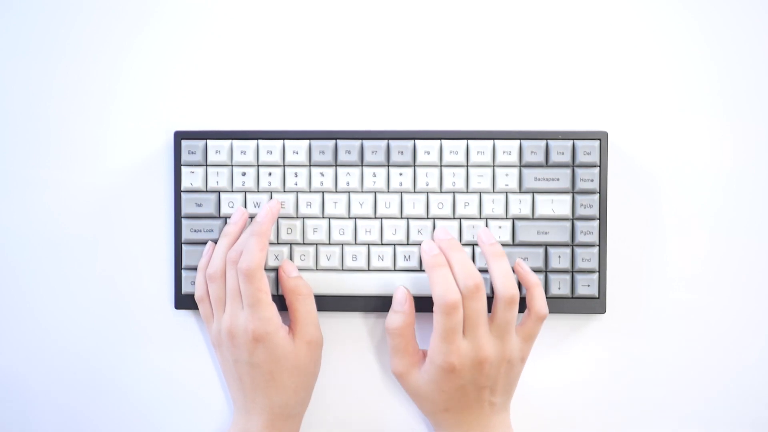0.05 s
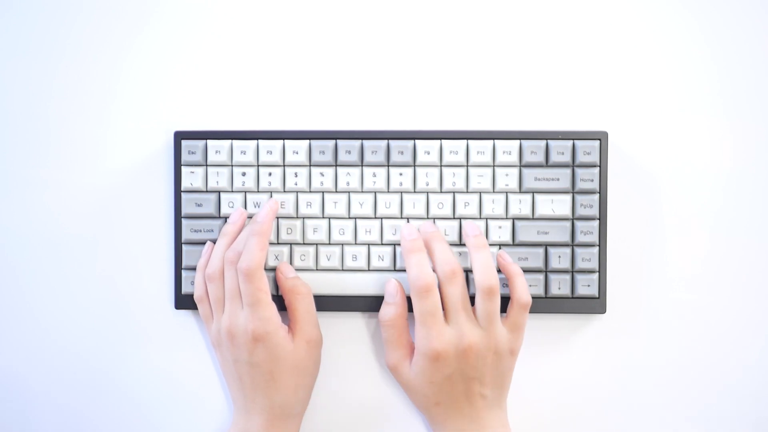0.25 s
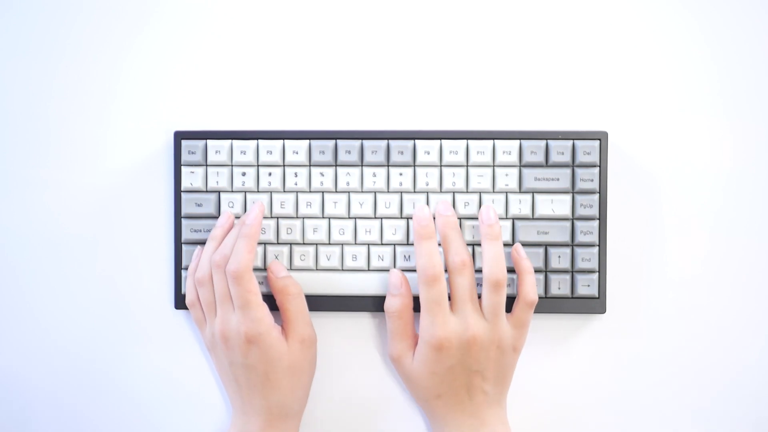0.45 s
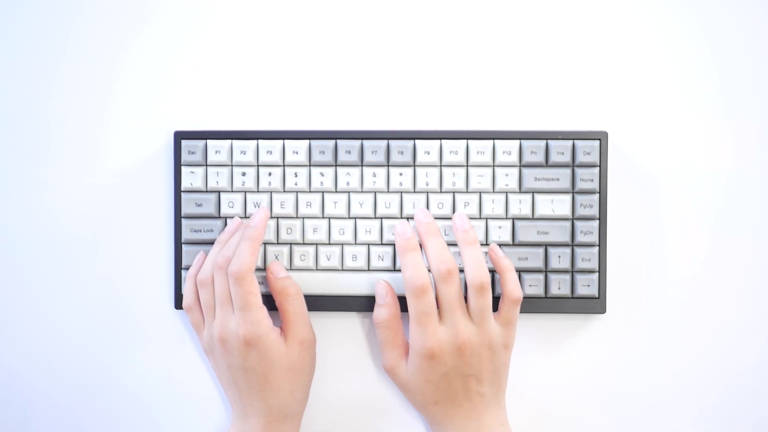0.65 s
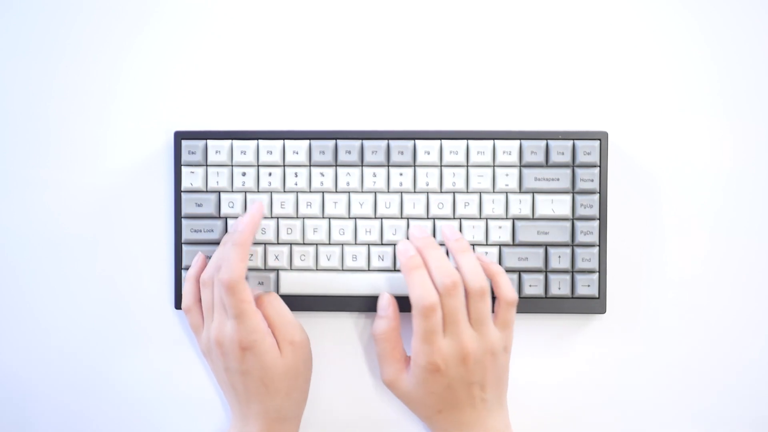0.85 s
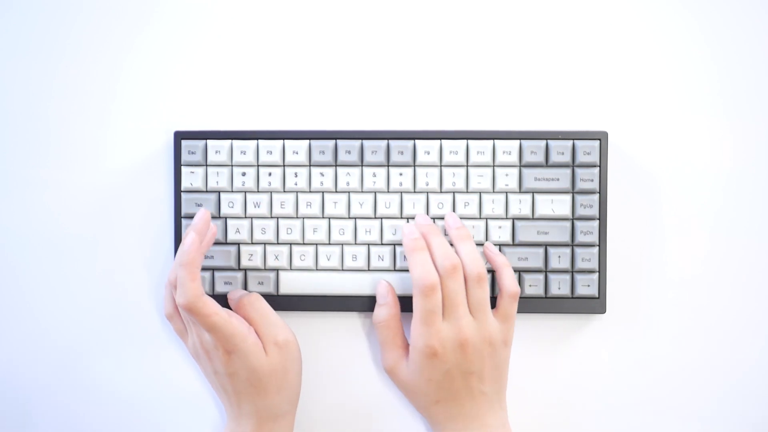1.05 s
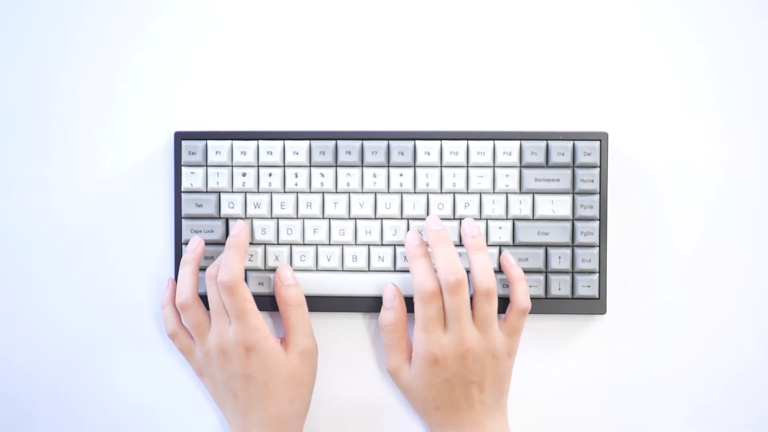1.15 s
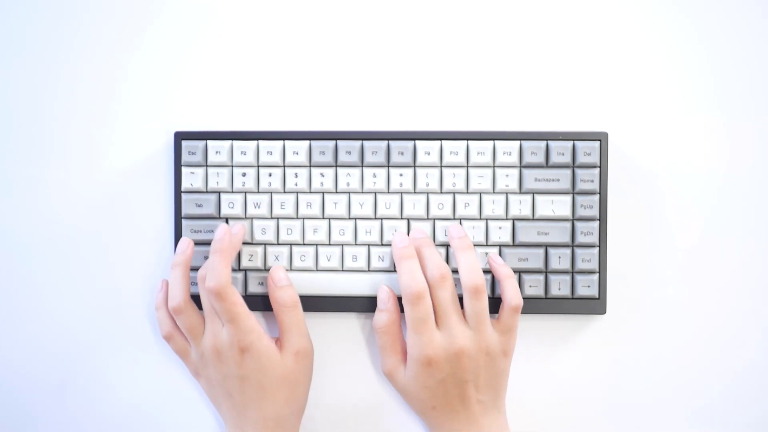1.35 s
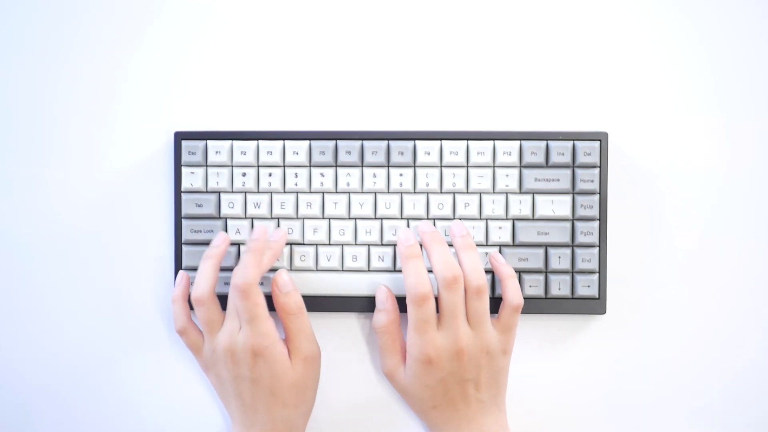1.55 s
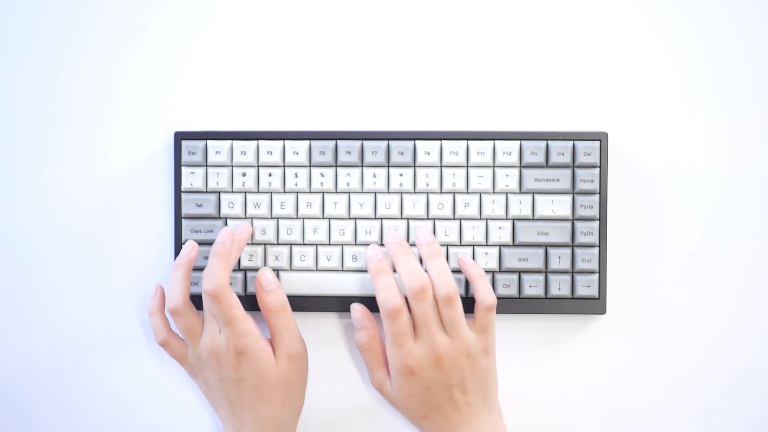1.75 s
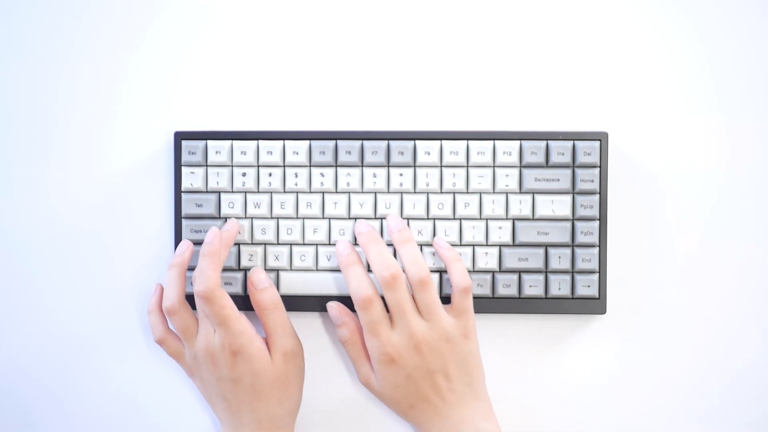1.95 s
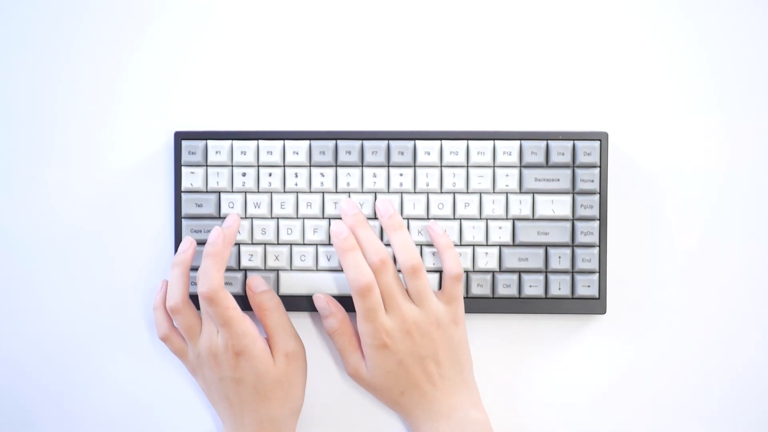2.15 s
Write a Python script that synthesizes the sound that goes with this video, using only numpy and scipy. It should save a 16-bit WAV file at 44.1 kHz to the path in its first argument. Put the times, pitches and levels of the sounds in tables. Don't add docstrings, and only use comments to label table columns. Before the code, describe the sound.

Mechanical keyboard typing, crisp plastic clacks in two short runs, in a small quiet room

```python
import sys
import numpy as np
from scipy import signal
from scipy.fft import rfft, irfft, next_fast_len
from scipy.io import wavfile

SR = 44100
rng = np.random.default_rng(int(sys.argv[2]) if len(sys.argv) > 2 else 0)


def waveform_to_disk(signal):
    frames = np.transpose(np.atleast_2d(signal))
    scaled = np.clip(frames, -1, 1) * 32767
    samples = np.round(scaled).astype(np.int16)
    wavfile.write(sys.argv[1], SR, samples)


def ratio_of_db(decibels):
    return 10 ** (np.asarray(decibels, float) / 20)


N = 97020
LEAD = 8192
JITTER_DB = 1


def curve(table, hz):
    table = np.array(table, float)
    return np.interp(np.log(hz + 1), np.log(table[:, 0]), table[:, 1])


def colour(x, db_of):
    size = next_fast_len(x.shape[-1] + 4096)
    gain_db = db_of(np.fft.rfftfreq(size, 1 / SR))
    cepstrum = irfft(gain_db * np.log(10) / 20, size)
    cepstrum[1:size // 2] *= 2
    cepstrum[size // 2 + 1:] = 0
    response = np.exp(rfft(cepstrum))
    return irfft(rfft(x, size) * response, size)[..., :x.shape[-1]]


def bump(hz, centre_hz, width_hz, db):
    return db / (1 + (2 * (hz - centre_hz) / width_hz) ** 2)


def ring(t, hz, db, t60_s):
    age = np.log(1000) * t / t60_s
    return ratio_of_db(db) * np.sin(2 * np.pi * hz * t) * age * np.exp(1 - age)


# start_s [s], level_db [dB], cap_hz [Hz], click_db [dB], spring_db [dB]
EARLIER = [
    (-0.062, -14, 2040, 4, -20),
]
# start_s [s], level_db [dB], cap_hz [Hz], click_db [dB], spring_db [dB]
BOTTOMS = [
    (0.2332, -4.5, 2740, 4.5, -21),
    (.4570, -6, 2290, 5.5, -9.5),
    (1.1827, -12, 2550, -1.5, -22),
    (1.348, -5, 2645, 1, -21),
    (1.447, 0, 3170, -1, -32),
    (1.6550, -11.5, 2580, 0.5, -28),
    (1.7275, -12, 2320, -5.5, -20.5),
    (1.8587, -8.5, 2810, 1, -17),
]
# start_s [s], level_db [dB], cap_hz [Hz], click_db [dB], spring_db [dB]
RETURNS = [
    (.3440, -12, 2810, 4.5, -14.5),
    (0.5448, -12.5, 2790, 2, -22.5),
    (1.1696, -16, 3350, 5.5, -22),
    (1.3157, -23.5, 2500, 3, -16),
    (1.5454, -10, 2650, -1, -15),
    (1.6337, -22, 2540, -1, -26),
    (1.7225, -16, 2540, -1, -33),
    (1.9126, -16.5, 2400, 2, -13.5),
]
# start_s [s], level_db [dB], cap_hz [Hz], click_db [dB], spring_db [dB]
TOUCHES = [(.2245, -25, 3000, 0, -24), (.2285, -19, 2200, 0, -26), (.4515, -28, 2600, 0, -22),
           (1.3405, -18, 2900, 0, -20), (1.4380, -25, 3100, -3, -24), (1.8480, -17, 3200, -3, -22),
           (1.8535, -15, 2900, -3, -20), (.9105, -50, 4500, 14, -14), (.9530, -32, 3500, -8, -34),
           (.9635, -30, 2700, -8, -34), (2.0185, -26, 3150, -3, -20), (2.0465, -29, 3500, -3, -20)]
# ratio [x cap_hz], level_db [dB]
CAP_PARTIALS = [(0.701, -6), (1, -1), (1.3, -10)]
# mode_hz [Hz], level_db [dB], t60_s [s]
SPRING_MODES = [(9474, 2, 0.0037), (9545, -3.5, 0.0049), (9800, -8.5, 0.0026)]
# freq_hz [Hz], gain_db [dB]
CLICK_COLOUR = [(700, -20), (1500, 3), (3000, 11), (4200, 3), (7000, 2.5), (9000, 2), (11500, -8),
                (15000, -13.5)]
CAP_T60_S, CAP_DB, CLICK_DB, LAG_S = .0024, 0.5, 3, .0004


def strokes(rows, contact_s):
    body_out, click_out = np.zeros((2, N + 2 * LEAD))
    t = np.arange(2048) / SR
    chance = rng.standard_normal((len(rows), 512))
    for (start_s, level_db, cap_hz, click_db, spring_db), c in zip(rows, chance):
        modes = [(cap_hz * ratio, db + CAP_DB, CAP_T60_S) for ratio, db in CAP_PARTIALS]
        modes += [(hz, db + spring_db, t60_s) for hz, db, t60_s in SPRING_MODES]
        body = 0
        for k, (hz, db, t60_s) in enumerate(modes, 1):
            body = body + ring(t, hz, db + JITTER_DB * c[-k], t60_s)
        force = np.sign(c[16:-16]) * np.exp(-t[:480] / contact_s)
        force = force / np.sqrt(np.sum(force ** 2)) * force[0]
        heard = np.convolve(body, force)[:len(t)]
        i = LEAD + int((start_s + LAG_S) * SR)
        body_out[i:i + len(t)] -= ratio_of_db(level_db) * heard * body.std() / heard.std()
        click_out[i:i + len(force)] += ratio_of_db(level_db + click_db + CLICK_DB) * force
    return np.array([body_out, colour(click_out, lambda hz: curve(CLICK_COLOUR, hz))])


# start_s [s], desk_db [dB], hollow_db [dB], plate_db [dB], wall_db [dB]
THUMPS = [(-.07, -32, -30, -36.5, -25.5), (0.235, -31, -25, -25, -24), (.3445, -38, -30.5, -30, -22.5),
          (0.4574, -25.5, -26, -38, -19.5), (.545, -38, -38.5, -30.5, -25), (.96, -47.5, -42, -43, -40),
          (1.171, -48, -33.5, -62, -38.5), (1.183, -38, -31.5, -35, -32.5), (1.316, -59, -45, -36, -35.5),
          (1.3483, -32, -25.5, -30.5, -22), (1.4475, -35.5, -27, -29, -21.5), (1.546, -41, -29.5, -34, -35),
          (1.636, -50, -27.5, -40, -33.5), (1.6549, -39, -38.5, -38, -27), (1.7266, -42, -26.5, -30, -24.5),
          (1.859, -43, -32, -33, -27), (1.913, -39.5, -34, -31, -28)]
# mode_hz [Hz], level_db [dB], t60_s [s]
DESK_MODES = [(82, -2, 0.054), (110, -4.5, 0.09), (159.4, -5.5, 0.16)]
# mode_hz [Hz], level_db [dB], t60_s [s]
HOLLOW_MODES = [(243.9, -7, 0.08), (300.6, -4, 0.06), (406, -10.5, 0.068)]
# mode_hz [Hz], level_db [dB], t60_s [s]
PLATE_MODES = [(526.3, -10.5, 0.032), (774, -4.5, 0.022), (992, -2, 0.02)]
# mode_hz [Hz], level_db [dB], t60_s [s]
WALL_MODES = [(1123, -2.5, 0.017), (1323, -1.5, 0.014), (1630, -3.5, 0.013)]
PITCH_JITTER = .015


def desk():
    out = np.zeros((2, N + 2 * LEAD))
    t = np.arange(LEAD) / SR
    parts = (DESK_MODES, HOLLOW_MODES, PLATE_MODES, WALL_MODES)
    chance = rng.standard_normal((len(THUMPS), 4, 3, 2))
    for (start_s, *part_dbs), c in zip(THUMPS, chance):
        i = LEAD + int(start_s * SR)
        for k, modes in enumerate(parts):
            for (hz, db, t60_s), (a, b) in zip(modes, c[k]):
                level_db = db + part_dbs[k] + JITTER_DB * b
                out[k // 2, i:i + LEAD] += ring(t, hz * (1 + PITCH_JITTER * a), level_db, t60_s)
    return out


# delay_s [s], level_db [dB]
ECHOES = [
    (.0032, -4),
    (.0090, -10),
    (.0118, -10),
    (.0195, -10),
]
# freq_hz [Hz], t60_s [s]
ROOM_T60 = [(100, 0.15), (300, 0.95), (700, 0.59), (1800, 0.27), (4800, 0.49), (12000, 0.28)]
# freq_hz [Hz], side_db [dB]
ROOM_SIDE = [(100, -19.5), (500, -4), (1500, -10.5), (4000, -10), (12000, -6.5)]
ROOM_DB, ROOM_RISE_S = -25, 0.001


def room():
    t = np.arange(int(SR / 2)) / SR
    hz = np.fft.rfftfreq(len(t), 1 / SR)
    noise = rfft(rng.standard_normal((2, len(t))))
    tail = 0
    for centre_hz in 44 * 2. ** np.arange(9):
        share = np.clip(1 - abs(np.log2((hz + 1) / centre_hz)), 0, 1)
        decay = np.exp(-np.log(1000) * t / curve(ROOM_T60, centre_hz))
        mid, side = irfft(noise * share, len(t)) * decay
        tail = tail + mid + ratio_of_db(curve(ROOM_SIDE, centre_hz)) * side * np.array([[1], [-1]])
    tail = tail * ratio_of_db(ROOM_DB) * (1 - np.exp(-t / ROOM_RISE_S))
    for delay_s, level_db in ECHOES:
        tail[:, int(delay_s * SR)] += ratio_of_db(level_db)
    return tail


def reverberate(x):
    return signal.fftconvolve(x[None], room(), axes=1)[:, :len(x)]


# freq_hz [Hz], level_db [dB]
HUM_COLOUR = [(25, -22), (60, -13.5), (110, -6.5), (200, 1), (700, -9), (1200, -13.5), (2000, -23),
              (15500, -39)]
# centre_hz [Hz], width_hz [Hz], gain_db [dB]
HUM_PEAKS = [(151, 8.3, 12), (265, 12, 1), (323, 86, 1)]
# freq_hz [Hz], side_db [dB]
HUM_SIDE = [(30, 4), (200, -8.5), (1000, -1.5), (10000, -3)]
HUM_DB = -42.5


def hum():
    mid, side = rng.standard_normal((2, N))
    side = colour(side, lambda hz: curve(HUM_SIDE, hz))
    air = colour(np.array([mid + side, mid - side]),
                 lambda hz: curve(HUM_COLOUR, hz) + sum(bump(hz, *peak) for peak in HUM_PEAKS))
    return air * ratio_of_db(HUM_DB) / air.std()


UPWARD_CLICK_DB = -9
CAP_WET_DB, DESK_WET_DB, CASE_WET_DB = -7, -12, -1.5


def scene():
    keys = strokes(EARLIER + BOTTOMS + RETURNS, contact_s=.00001)
    touches = strokes(TOUCHES, contact_s=.003)
    cap, click = keys + touches
    boom, knock = desk()
    direct = cap + ratio_of_db(UPWARD_CLICK_DB) * click + boom + knock
    soft_wet = reverberate(ratio_of_db(CAP_WET_DB) * cap + ratio_of_db(DESK_WET_DB) * boom)
    hard_wet = reverberate(click + ratio_of_db(CASE_WET_DB) * knock)
    heard = direct + soft_wet + hard_wet
    return heard[:, LEAD:LEAD + N] + hum()


def top_cut(x):
    return signal.sosfilt(signal.butter(12, 15960, fs=SR, output="sos"), x)


def record(dry):
    def mic_db(hz):
        peak = bump(hz, centre_hz=9510, width_hz=850, db=2)
        dip = bump(hz, centre_hz=7900, width_hz=250, db=-8)
        low_cut = 10 * np.log10(1 + (45 / (hz + 5)) ** 4)
        return peak + dip - low_cut

    return top_cut(np.clip(colour(dry, mic_db), -1, 1))


dry = scene()
out = record(dry)
waveform_to_disk(out)
```